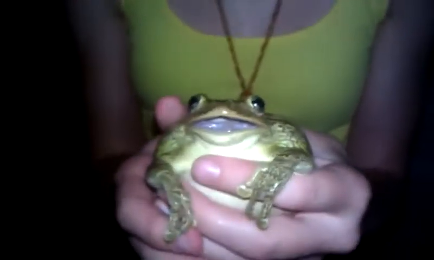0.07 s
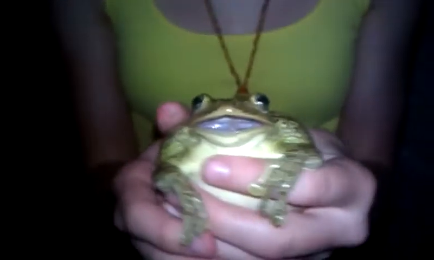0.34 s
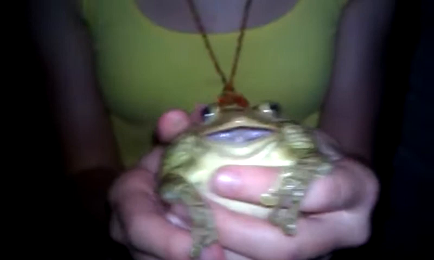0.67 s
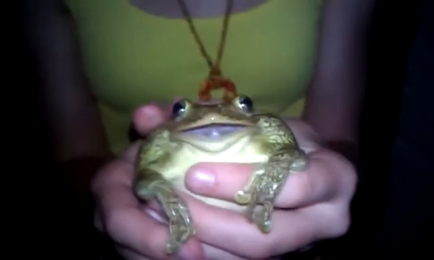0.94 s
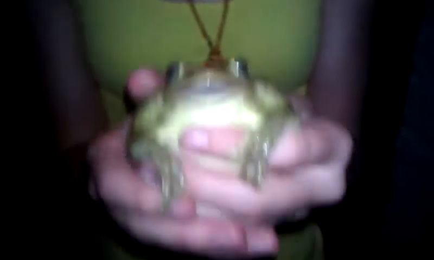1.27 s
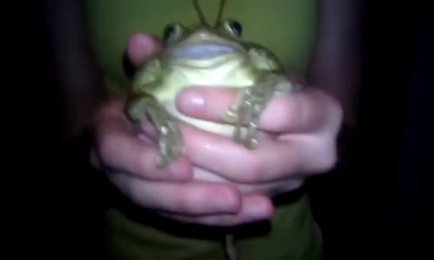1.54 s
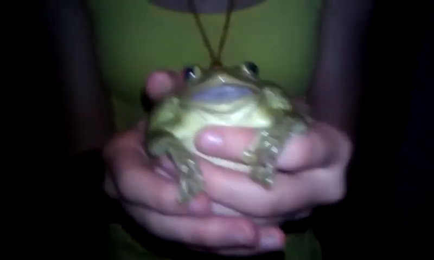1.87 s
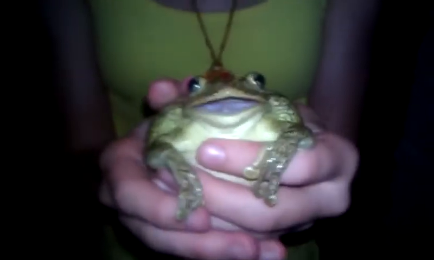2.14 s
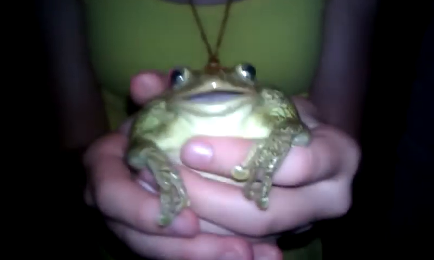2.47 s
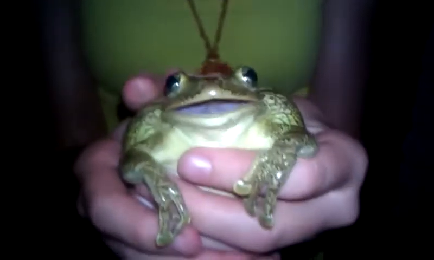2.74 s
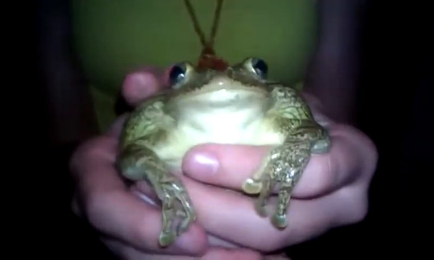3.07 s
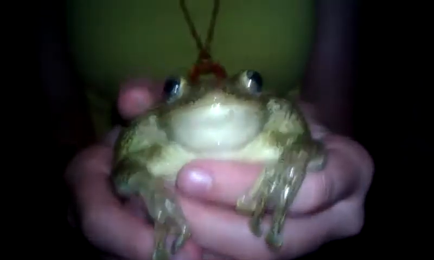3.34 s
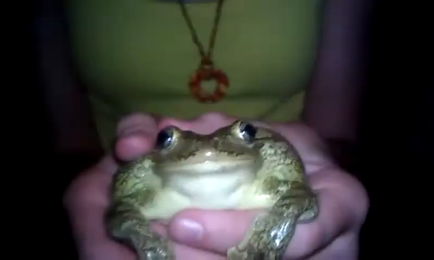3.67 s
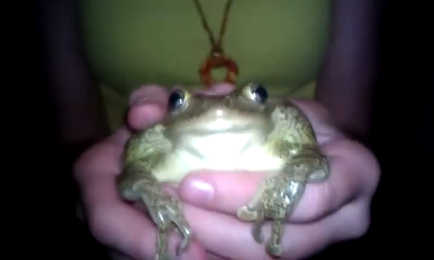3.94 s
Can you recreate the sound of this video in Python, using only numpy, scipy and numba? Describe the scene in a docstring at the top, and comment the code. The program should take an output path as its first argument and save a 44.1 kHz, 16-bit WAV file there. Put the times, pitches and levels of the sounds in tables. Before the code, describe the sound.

A frog screams close to the microphone, one loud, shrill cry with its pitch heaving up and down. The cry drops into a short low croak, leaving faint distant insects and soft hand rubs outdoors at night.

```python
"""Night, outdoors. A frog held in two hands screams close to a camera, whose gain control holds it flat.
One long cry: vocal cord pulses ring the mouth, and the pitch heaves up and down.
Near 2.8 s the mouth closes, the pulses slow and the cry collapses into a short low croak.
Afterwards insects shimmer in the distance and the hands shift faintly."""
import sys
import numpy as np
from scipy import signal
from scipy.fft import rfft, irfft, next_fast_len
from scipy.io import wavfile
from scipy.ndimage import uniform_filter1d, map_coordinates
from numba import njit

SR = 44100
rng = np.random.default_rng(int(sys.argv[2]) if len(sys.argv) > 2 else 0)


def wav_out(sig):
    """Save sig, one row per channel (or a flat mono array), as 16-bit PCM at SR to the path in sys.argv[1]."""
    wavfile.write(sys.argv[1], SR, np.round(np.clip(np.atleast_2d(sig).T, -1, 1) * 32767).astype(np.int16))


N = 176400

# Background spectra: f/Hz, level/dB
NIGHT_SPECTRUM = [(30, -42), (60, -17), (115, -17.5), (200, 11.5), (280, -5.5), (600, -3), (1200, -12),
                  (1800, -2.5), (4200, -2), (5500, -18), (8200, -12), (9200, -68), (12000, -59)]
CHORUS_SPECTRUM = [(5600, -46), (5850, -23.5), (6200, -8), (6350, -19), (6650, -5), (6850, -19),
                   (7050, -18), (7800, -41), (9000, -69)]
# Nearer insects: start t/s, length/s, f/Hz, level/dB
CHIRPS = [(2.987, 0.07, 6070, -54), (3.226, 0.2, 6220, -49.5), (3.546, 0.18, 6040, -53)]
# Skin on skin: centre t/s, half length/s, f/Hz, width/Hz, level/dB
RUBS = [(3.175, 0.017, 3900, 3500, -54.5), (3.34, 0.029, 1610, 695, -63.5), (3.475, .022, 1670, 595, -57.5),
        (3.582, 0.059, 1660, 600, -62.5), (3.81, 0.045, 4000, 900, -50)]
# Moist ticks: t/s, f/Hz, width/Hz, level/dB
TICKS = [(3.45, 6000, 2990, -53), (3.587, 1970, 693, -42), (3.768, 1770, 1200, -50)]
# Outdoor echo decay: f/Hz, T60/s
ECHO_DECAY = [(200, 0.02), (1000, 0.1), (2600, 0.26), (3500, 0.11), (5000, 0.19), (12000, 0.016)]
# Low air under the cry: f/Hz, level/dB
RUMBLE_SPECTRUM = [(15, 7), (30, 0), (80, -13), (120, -40), (180, -27), (250, -70), (500, -75)]
WHEEZE_SPECTRUM = [(270, -52.5), (370, 13), (560, 3), (750, -14), (900, -37)]
# Thumps of the closing mouth: t/s, f/Hz, level/dB
GULPS = [(2.793, 376, -28), (2.879, 388, -39)]
# Voice contour: t/s, pitch f/Hz, mouth resonance f/Hz
CONTOUR = [(0.0, 469.2, 3110), (0.1, 478.3, 3607), (0.32, 504.2, 3494), (0.377, 495.7, 3820),
           (0.456, 444.5, 3210), (0.5, 454, 3170.0), (0.619, 490.3, 3460), (0.71, 498.6, 3724),
           (0.837, 439.6, 3200), (0.873, 432, 3110), (0.912, 439, 3030.0), (0.943, 465, 3270),
           (1.001, 455.0, 3504), (1.091, 469, 3820.0), (1.22, 432.4, 2930), (1.259, 428, 3120.0),
           (1.288, 457.8, 3108), (1.363, 446.8, 3646), (1.427, 468.3, 3778), (1.46, 457.8, 3930),
           (1.557, 422.3, 3060), (1.633, 408.3, 3085), (1.666, 420, 3130), (1.719, 448, 3300.0),
           (1.798, 464, 3607), (1.846, 466.3, 3804), (1.872, 455.3, 3460), (1.928, 419, 3244),
           (1.97, 407.7, 3060), (2.019, 400.3, 2935), (2.124, 440.5, 3280), (2.141, 432, 3425),
           (2.221, 440.0, 3504), (2.283, 405.4, 3430), (2.366, 379.5, 2904), (2.411, 368.8, 2610),
           (2.468, 378.4, 2717), (2.527, 420.7, 3116), (2.576, 415.4, 3320), (2.608, 434.8, 3380.0),
           (2.648, 422.2, 3400.0), (2.685, 408.4, 3388), (2.73, 351.1, 3080), (2.748, 305.0, 2950),
           (2.765, 230, 2750.0), (2.787, 198.0, 2540), (2.812, 172.5, 2202), (2.85, 167, 1910),
           (2.889, 161.7, 1515), (2.926, 134, 1043), (3.03, 115, 900.0)]
# Voice effort: t/s, cry level/dB, croak level/dB
EFFORT = [(0, 6, -85), (2.66, 3.5, -79), (2.76, -11, -37.5), (2.8, -24.5, -28.5), (2.83, -27, -28.5),
          (2.885, -38, -29.5), (2.905, -81, -30.5), (2.925, -69, -41), (2.99, -81, -54), (3.015, -58, -46),
          (3.045, -103, -94)]
# Pushes at the pitch crests: centre t/s, half length/s, edge level/dB, treble flare/dB
PUSHES = [(0.259, 0.12, -6, 15.5), (0.673, 0.17, -16.5, 11.5), (1.02, .06, -8.5, 17.5),
          (1.37, 0.11, -8, 17), (1.768, 0.074, -17, 15), (2.17, 0.089, -10.5, 9.5),
          (2.599, 0.077, -8.5, 15)]
# Rough catches in the cry: centre t/s, half length/s, rasp level/dB
CATCHES = [(1.498, 0.011, -39), (2.3, 0.0094, -50), (.43, 0.02, -22), (0.822, 0.025, -37),
           (1.359, 0.0083, -6.5), (1.688, 0.017, -44)]
# Colours of the cord pulses: f/Hz, level/dB
BODY_SPECTRUM = [(200, -59.5), (330, -26), (450, -2.5), (900, -15), (1300, 4.5), (1850, 16), (2400, 21.5),
                 (3000, -25), (4400, 13.5), (5500, 4), (7000, -68)]
TREBLE_SPECTRUM = [(3500, -22), (5200, 1), (6200, 6), (7200, 7), (8200, 7), (9500, 0), (11500, 0),
                   (12800, 6), (14000, 10), (15000, 11), (16000, 7)]
CROAK_SPECTRUM = [(120, -48), (290, -16), (380, 0.5), (520, -3), (660, 1.5), (830, 6.5), (1100, -1),
                  (1350, 5.5), (1700, 1.5), (2400, -5), (3500, -6), (4400, -9), (5300, -26), (8000, -18.5),
                  (10000, -59)]
# Camera response: f/Hz, level/dB
CAMERA_RESPONSE = [(120, 9), (230, 0), (340, 9), (600, 7), (1200, 9), (2500, 0), (16000, 0)]


def amp(db):
    """Decibels to gain."""
    return 10 ** (np.asarray(db) / 20)


def unit(x):
    """Scale to rms 1."""
    return x / np.sqrt(np.mean(x ** 2) + 1e-20)


def clock():
    """Sample times in s."""
    return np.arange(N) / SR


def bump(centre_s, half_s):
    """Gaussian swell, peak 1."""
    return np.exp(-((clock() - centre_s) / half_s) ** 2)


def along(points, hz):
    """Interpolate (f/Hz, value) points on a log axis."""
    knots_hz, values = np.transpose(points)
    return np.interp(np.log(hz + 1), np.log(knots_hz + 1), values)


def curves(rows, smooth_samples):
    """One smoothed curve per column after the time."""
    times_s, *columns = np.transpose(rows)
    return [uniform_filter1d(np.interp(clock(), times_s, c), smooth_samples) for c in columns]


def wobble(knots_per_s):
    """Smooth random curve."""
    return map_coordinates(rng.standard_normal(2000), [clock() * knots_per_s], mode="wrap")


def coloured(x, spectrum):
    """Minimum-phase filter from (f/Hz, level/dB) points."""
    size = 2 * next_fast_len(N // 2 + SR // 8)
    gain = amp(along(spectrum, np.fft.rfftfreq(size, 1 / SR)))
    cepstrum = irfft(np.log(gain), size)
    cepstrum[1:size // 2] *= 2
    cepstrum[size // 2 + 1:] = 0
    return irfft(rfft(x, size) * np.exp(rfft(cepstrum)), size)[:N]


def noise(spectrum):
    """Coloured noise, rms 1."""
    return unit(coloured(rng.standard_normal(N), spectrum))


def band(hz, width_hz):
    """Noise in one resonance, rms 1."""
    return unit(signal.lfilter(*signal.iirpeak(hz, hz / width_hz, SR), rng.standard_normal(N)))


def running_rms(x, window_s):
    """Rms in a twice-applied sliding window."""
    size = max(int(window_s * SR), 2)
    return np.sqrt(np.abs(uniform_filter1d(uniform_filter1d(x ** 2, size), size)) + 1e-14)


def even(x):
    """Hold at rms 1."""
    return x / running_rms(x, window_s=.02)


@njit
def resonate(x, angle_rad, radius):
    """One moving complex pole."""
    out, z = np.zeros(len(x)), 0j
    for i in range(len(x)):
        z = z * radius * np.exp(1j * angle_rad[i]) + x[i]
        out[i] = z.real
    return out


def ring(x, centre_hz, width_hz, order):
    """Cascade of moving resonances, held at rms 1."""
    for _ in range(order):
        x = resonate(x, 2 * np.pi * centre_hz / SR, np.exp(-np.pi * width_hz / SR))
    return even(x)


def night(level_db=-59):
    """Steady background hush."""
    return amp(level_db) * noise(NIGHT_SPECTRUM)


def insects(chorus_db=-52, flicker_db=1.5, waver_hz=18):
    """Far shimmering chorus, a few nearer chirps."""
    out = amp(chorus_db + flicker_db * wobble(81)) * noise(CHORUS_SPECTRUM)
    for start_s, length_s, hz, db in CHIRPS:
        progress = np.clip((clock() - start_s) / length_s, 0, 1)
        swell = np.sqrt(np.abs(np.sin(np.pi * progress)))
        out += amp(db) * swell * np.sin(2 * np.pi * np.cumsum(hz + waver_hz * wobble(120)) / SR)
    return out


def hands(tick_decay_s=.0029, cutoff_hz=8000):
    """Skin rubs and ticks as the grip shifts."""
    t, out = clock(), np.zeros(N)
    for centre_s, half_s, hz, width_hz, db in RUBS:
        out += amp(db) * bump(centre_s, half_s) * band(hz, width_hz)
    for start_s, hz, width_hz, db in TICKS:
        decay = (t >= start_s) * np.exp(-np.abs(t - start_s) / tick_decay_s)
        out += amp(db) * decay * band(hz, width_hz)
    return signal.sosfilt(signal.butter(8, cutoff_hz, fs=SR, output="sos"), out)


def outdoor_echo(x, level_db=-11.5):
    """Thin echo; each frequency dies at its own rate."""
    hz, t, spectra = signal.stft(rng.standard_normal(SR // 2), SR, nperseg=256)
    decay = amp(-60 * t / along(ECHO_DECAY, hz)[:, None])
    tail = signal.istft(spectra * decay, SR, nperseg=256)[1]
    return amp(level_db) * signal.fftconvolve(x, tail / np.linalg.norm(tail))[:N]


def afterring(x, hz=3440, t60_s=.7, level_db=-46):
    """Thin tone, set ringing by the cry and outlasting it."""
    t = np.arange(SR) / SR
    tone = np.sin(2 * np.pi * hz * t) * amp(-60 * t / t60_s)
    return amp(level_db) * signal.fftconvolve(x, tone / np.linalg.norm(tone))[:N]


def chest_reflection(x, mean_delay_s=.0011, sway_s=.00008, level_db=-9):
    """Bounce off the holder's chest; as the frog sways, single overtones swell and sink."""
    delay_s = mean_delay_s + sway_s * wobble(9)
    return amp(level_db) * map_coordinates(x, [np.arange(N) - delay_s * SR])


def draught(cry_db, gust_db=3, rumble_db=-51, wheeze_db=-47):
    """Low, gusty air that follows the cry's level."""
    gain = amp(cry_db - cry_db.max() + gust_db * wobble(14.34))
    return gain * (amp(rumble_db) * noise(RUMBLE_SPECTRUM) + amp(wheeze_db) * noise(WHEEZE_SPECTRUM))


def gulps(rise_s=.0085):
    """Hollow thumps as the mouth closes."""
    out = np.zeros(N)
    for start_s, hz, db in GULPS:
        age_s = np.maximum(clock() - start_s, 0)
        out += amp(db) * age_s / rise_s * np.exp(1 - age_s / rise_s) * np.sin(2 * np.pi * hz * age_s)
    return out


def croak(cords, air, rasp_db=-16):
    """Raspy pulses in a low throat colour."""
    return even(coloured(cords + amp(rasp_db) * air, CROAK_SPECTRUM))


def vocal_cords(pitch_hz, jitter_cycles=.0003, shimmer_db=.05):
    """One slightly uneven pulse and one puff of air per cycle."""
    cycles = np.cumsum(pitch_hz) / SR
    onsets = np.interp(np.arange(1, int(cycles[-1])), cycles, np.arange(N))
    scatter = rng.standard_normal((2500, 2))[:len(onsets)]
    onsets += jitter_cycles * scatter[:, 0] * SR / pitch_hz[onsets.astype(int)]
    taps = onsets.astype(int)[:, None] + np.arange(-7, 9)
    offsets = taps - onsets[:, None]
    pulses = np.sinc(offsets) * np.cos(np.pi * offsets / 16) ** 2 * amp(shimmer_db * scatter[:, 1:])
    train = np.bincount(np.clip(taps, 0, N - 1).ravel(), pulses.ravel(), N)
    air = unit(rng.standard_normal(N) * np.exp(-2 * (cycles % 1)))
    return even(train - pitch_hz / SR), air  # DC removed


def mouth(source, pitch_hz, mouth_hz, shake=.015, lock=.6, skirt_db=5, skirt_db_per_s=-2):
    """Sharp resonance on a broad skirt; the cry narrows as the frog tires."""
    shaky_hz = mouth_hz * (.975 + shake * wobble(45))
    overtone_hz = np.round(shaky_hz / pitch_hz) * pitch_hz
    sharp_hz = shaky_hz + lock * (overtone_hz - shaky_hz)  # clings to an overtone, cracks to the next
    broad = ring(source, mouth_hz, width_hz=1635, order=3)
    sharp = ring(broad, sharp_hz, width_hz=380, order=1)
    return even(sharp + amp(skirt_db + skirt_db_per_s * clock()) * broad)


def upper_resonance(source, pitch_hz, mouth_hz, mid_hz=8380, level_db=-23, db_per_octave=-22):
    """High ring: rises a little with the pitch, weakens as the mouth resonance climbs."""
    crying = clock() < EFFORT[1][0]
    opening_octaves = np.log2(mouth_hz / np.median(mouth_hz[crying]))
    centre_hz = mid_hz * np.sqrt(pitch_hz / np.median(pitch_hz[crying]))
    gain = amp(level_db + db_per_octave * opening_octaves)
    return gain * ring(source, centre_hz, width_hz=1200, order=2)


def cry(cords, air, pitch_hz, mouth_hz, glide, body_db=-16, treble_db=-28):
    """Pulses ring the mouth; each push adds a hard edge and treble, each slide adds rasp."""
    rasp_db, glide_rasp_db, top_rasp_db = -60, -31, -7  # the top frays most
    catch = sum(amp(db) * bump(centre_s, half_s) for centre_s, half_s, db in CATCHES)
    source = cords + (amp(rasp_db) + amp(glide_rasp_db) * glide + catch) * air
    ragged = cords + (amp(rasp_db) + (amp(glide_rasp_db) + amp(top_rasp_db)) * glide + catch) * air
    edge_gain = sum(amp(db) * bump(centre_s, half_s) for centre_s, half_s, db, _ in PUSHES)
    flare_db = sum(db * bump(centre_s, half_s) for centre_s, half_s, _, db in PUSHES)
    body = amp(body_db) * even(coloured(cords + catch * air, BODY_SPECTRUM))
    edge = edge_gain * ring(source, 1.264 * mouth_hz, width_hz=1360, order=3)
    treble = amp(treble_db + flare_db) * even(coloured(ragged, TREBLE_SPECTRUM))
    top = upper_resonance(ragged, pitch_hz, mouth_hz) + treble
    top_gain = np.interp(pitch_hz, [84, 406], [0, 1])
    return mouth(source, pitch_hz, mouth_hz) + edge + body + top_gain * top


def frog(flutter=.001, glide_flutter=.0045):
    """One pulse train drives cry, then croak; the pitch shakes more as it slides."""
    pitch_hz, mouth_hz = curves(CONTOUR, smooth_samples=900)
    cry_db, croak_db = curves(EFFORT, smooth_samples=400)
    glide = np.minimum(np.abs(np.gradient(np.log2(pitch_hz))) * SR, 2)  # octaves/s
    cords, air = vocal_cords(pitch_hz * (1 + (flutter + glide_flutter * glide) * wobble(70)))
    scream = amp(cry_db) * cry(cords, air, pitch_hz, mouth_hz, glide)
    return scream + amp(croak_db) * croak(cords, air) + draught(cry_db) + gulps()


def scene():
    """All sources at one microphone."""
    voice = frog()
    mono = voice + chest_reflection(voice) + outdoor_echo(voice) + afterring(voice)
    mono += insects() + hands() + night()
    return np.array([mono, mono])


def record(dry):
    """Camera: gain control, soft overload, colour, band limit."""
    ceiling_db, clip_db, top_hz, rolloff_hz = -17, -12.6, 15750, 300
    x = dry[0] / (1 + (running_rms(dry[0], window_s=.012) / amp(ceiling_db)) ** 4) ** (1 / 4)
    x = signal.resample_poly(x, 2, 1)
    x = x / (1 + np.abs(x / amp(clip_db)) ** 4) ** (1 / 4)
    x = coloured(signal.resample_poly(x, 1, 2), CAMERA_RESPONSE)
    size = next_fast_len(N + SR // 8)
    passband = np.clip((top_hz - np.fft.rfftfreq(size, 1 / SR)) / rolloff_hz + .5, 0, 1)
    x = irfft(rfft(x, size) * passband, size)[:N]
    return np.array([x, x])


dry = scene()
out = record(dry)
wav_out(out)
```